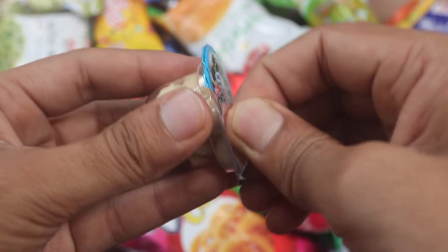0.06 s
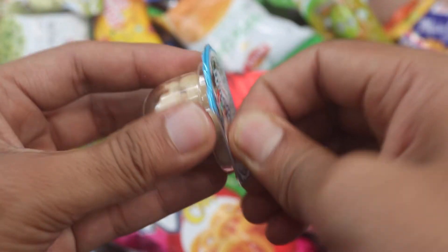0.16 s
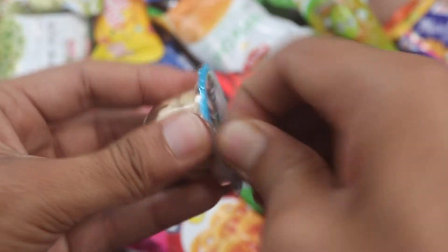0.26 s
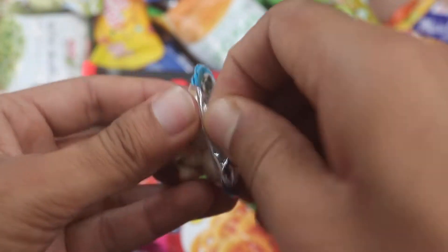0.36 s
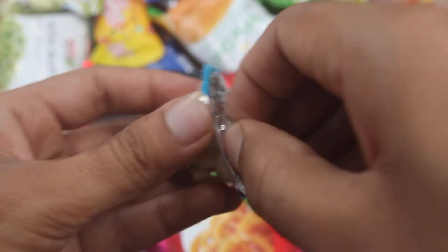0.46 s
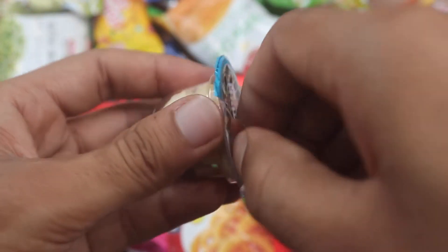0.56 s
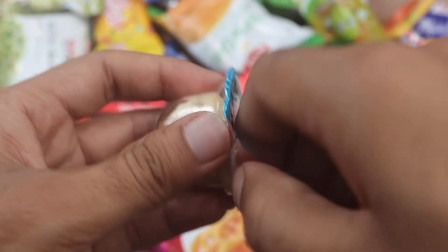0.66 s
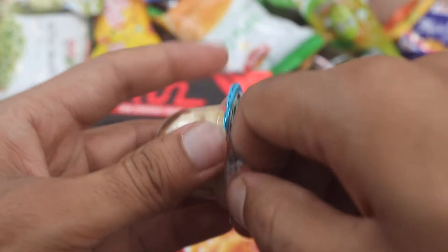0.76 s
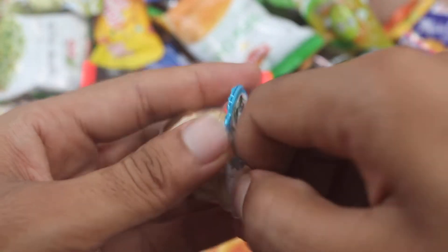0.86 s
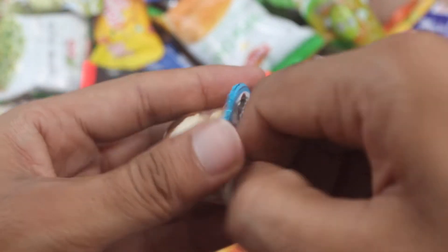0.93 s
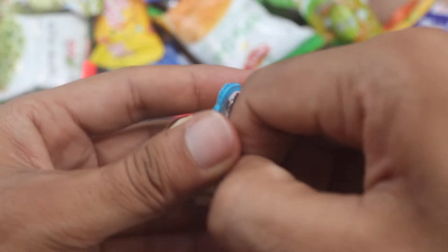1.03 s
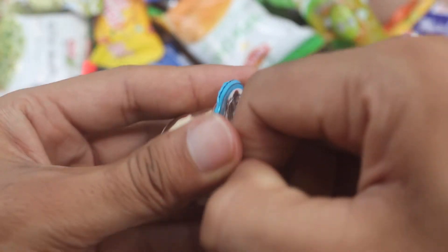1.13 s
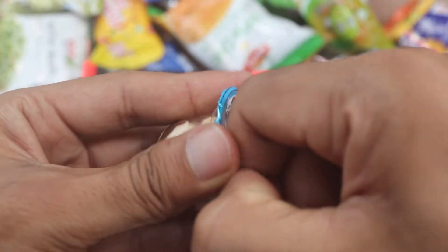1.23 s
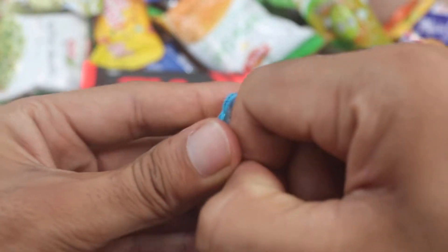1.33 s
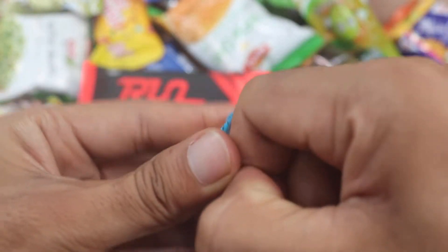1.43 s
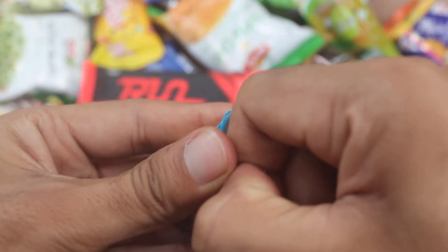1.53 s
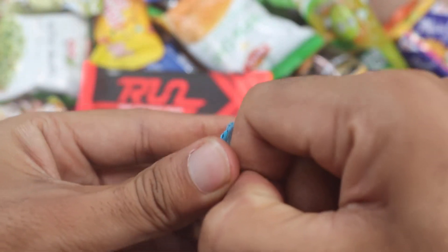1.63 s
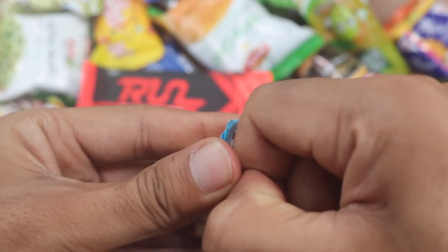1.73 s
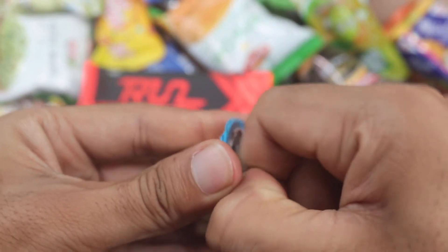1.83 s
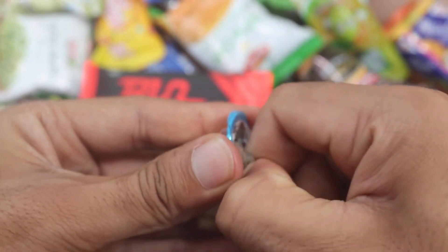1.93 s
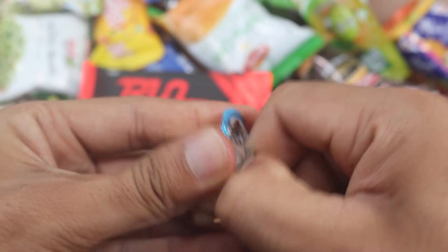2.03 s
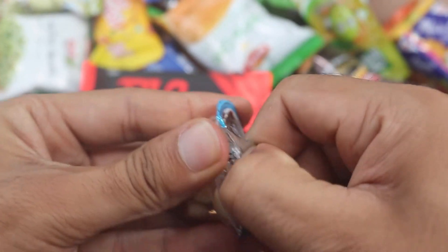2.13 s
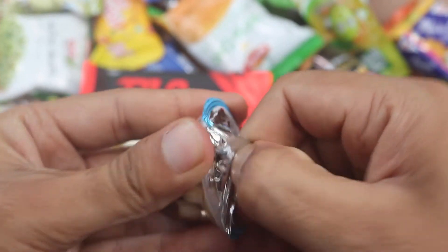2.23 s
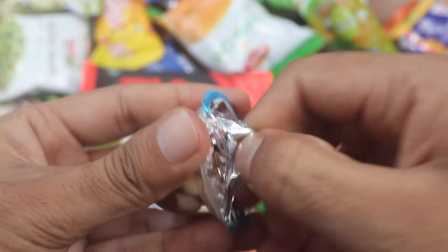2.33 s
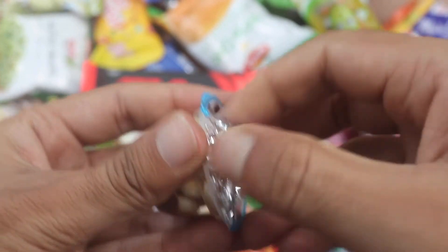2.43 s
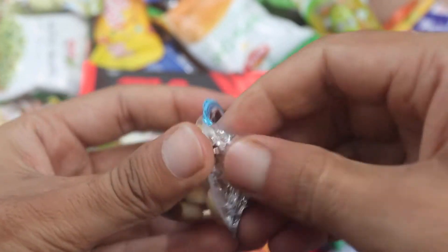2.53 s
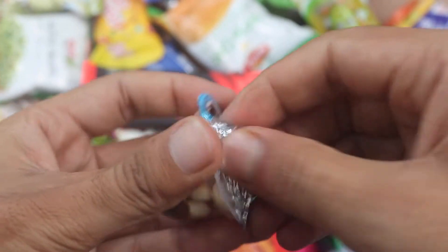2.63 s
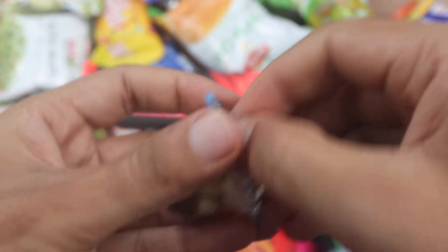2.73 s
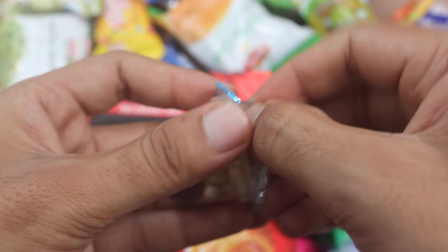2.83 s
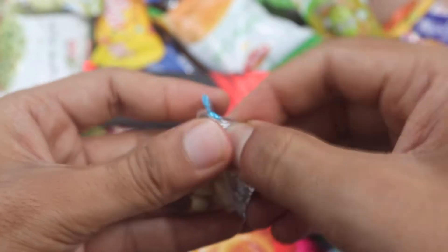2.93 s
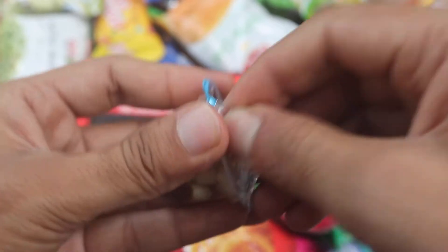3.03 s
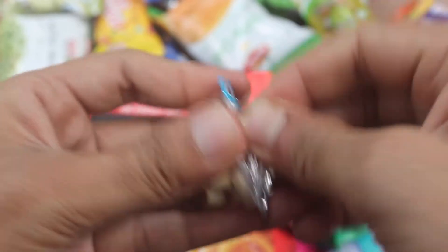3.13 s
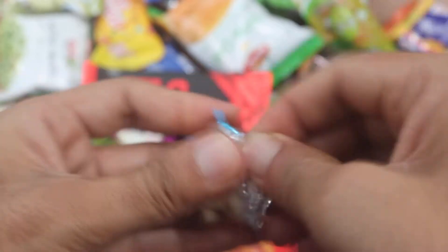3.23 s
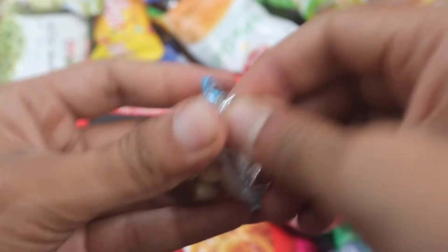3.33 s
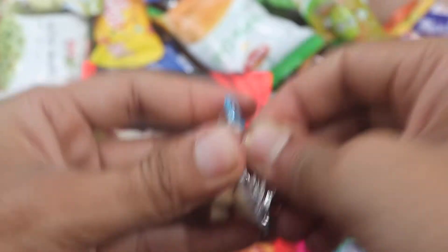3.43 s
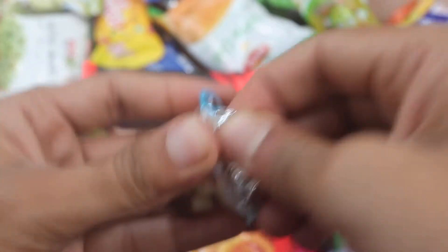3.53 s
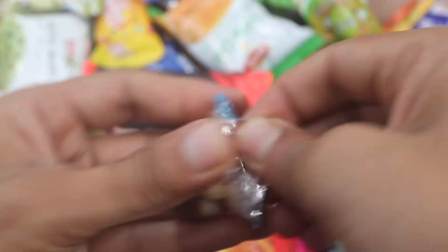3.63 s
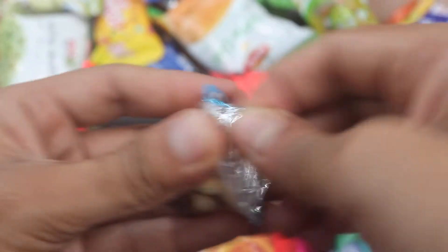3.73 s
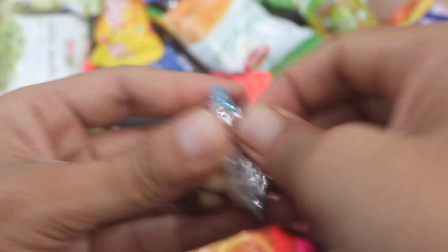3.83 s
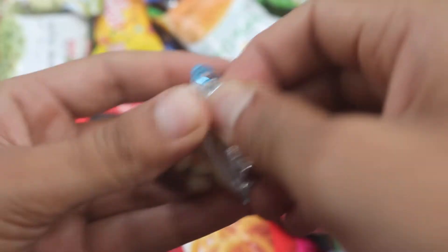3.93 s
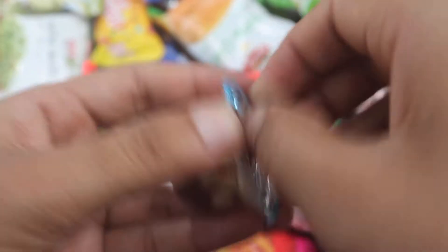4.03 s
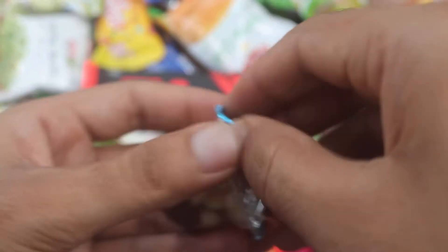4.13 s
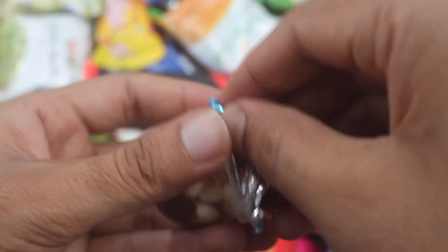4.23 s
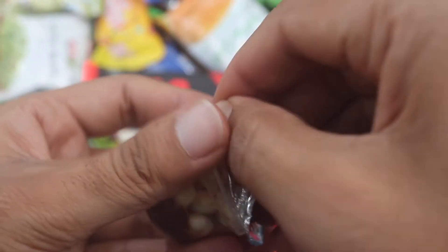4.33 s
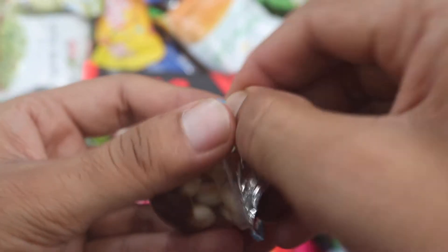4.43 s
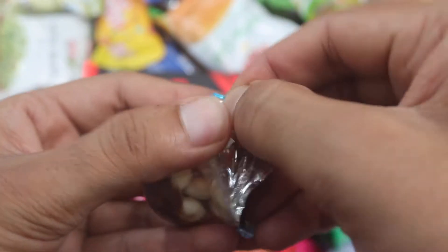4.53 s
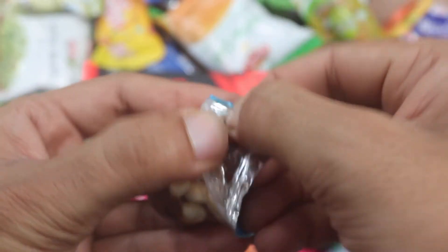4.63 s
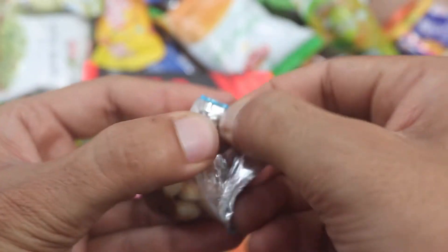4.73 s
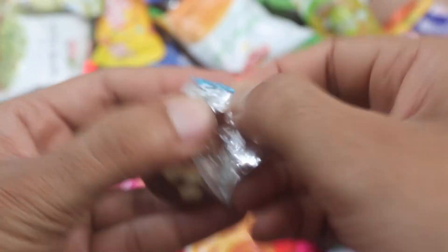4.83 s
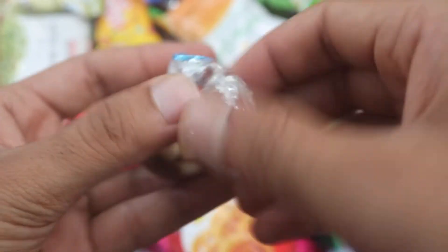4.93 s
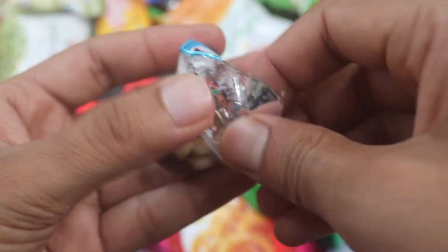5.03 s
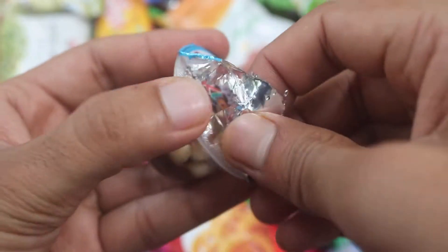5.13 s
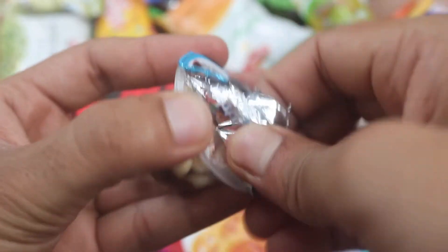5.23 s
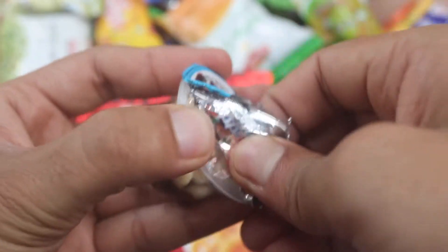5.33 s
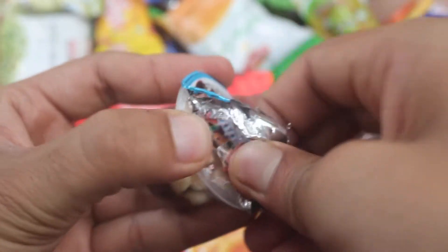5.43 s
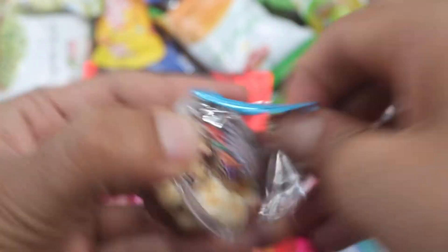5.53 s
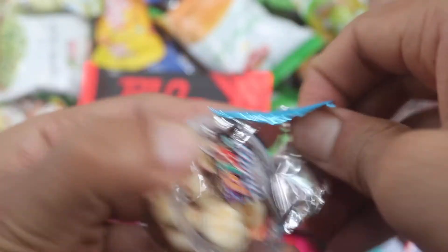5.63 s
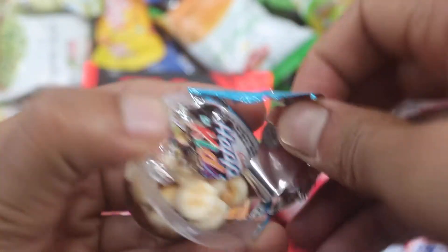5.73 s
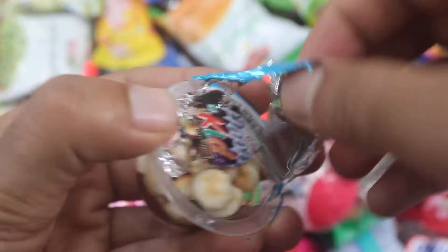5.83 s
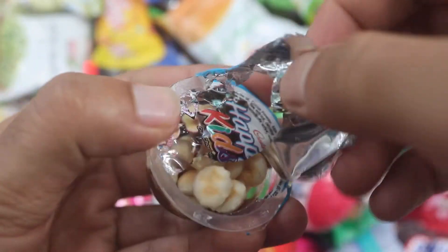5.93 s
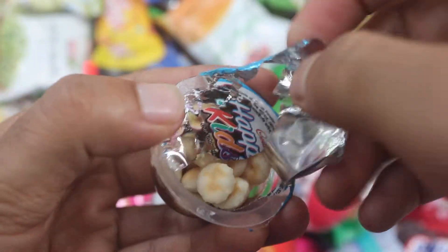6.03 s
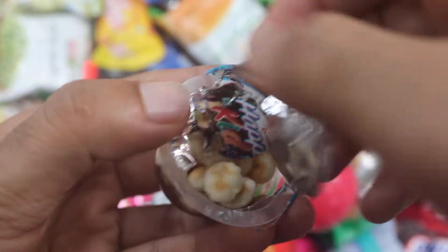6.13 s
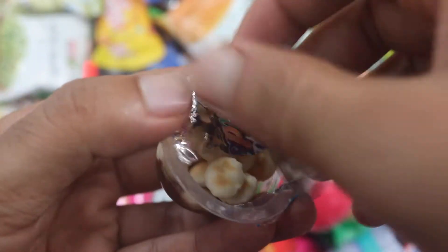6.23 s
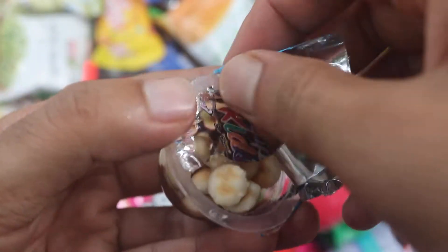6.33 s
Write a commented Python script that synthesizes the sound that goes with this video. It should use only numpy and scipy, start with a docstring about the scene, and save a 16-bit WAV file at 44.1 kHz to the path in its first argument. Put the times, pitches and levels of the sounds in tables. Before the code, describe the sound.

Sparse foil clicks grow into dense bright crackling, short rips of a tearing seal and finger rubs, over a faint quiet room murmur.

```python
"""Indoors, close to a stereo microphone, fingers work the foil lid off a small plastic cup.
Creases snap as cracks, fizz and a few cycles of cup ring; the seal tears in rushes of tiny fractures.
Hands rub as scraping and thudding noise, a fingertip slides in narrow bands, and the held foil rustles.
Under it lie a low noise murmur, a thin whine and a wandering high hiss; faint chirping pulses at the start."""
import sys
import numpy as np
from scipy import signal
from scipy.fft import rfft, irfft, next_fast_len
from scipy.io import wavfile
from scipy.ndimage import map_coordinates

SR = 44100
rng = np.random.default_rng(int(sys.argv[2]) if len(sys.argv) > 2 else 0)


def materialize(psi):
    """Save the field psi as 16-bit PCM at rate SR to the path in sys.argv[1].

    A 1-D psi becomes a single channel; in a 2-D psi each row is a channel.
    """
    bounded = np.clip(np.atleast_2d(psi).T, -1, 1)
    quanta = np.round(bounded * 32767).astype(np.int16)
    wavfile.write(sys.argv[1], SR, quanta)


N = 280917
TIME = np.arange(N) / SR  # s

# large creases snapping: start_s, level_db (before the snaps' common trim), ring_pitch_hz,
# brightness_db (fizz over ring)
CREASES = [(.024, -35.5, 1080, -20), (0.297, -33.5, 1420, -39), (.400, -41, 1710, -10),
           (.545, -47, 1300, 18), (.675, -41, 1230, -2), (.885, -44.5, 2100, 15), (1.157, -44.5, 1300, -28),
           (1.169, -34.5, 1410, -4), (1.220, -35, 1350, -4.5), (1.264, -38, 1130, -17),
           (1.277, -47.5, 1770, -7), (1.528, -51.5, 1170, -53), (1.980, -46, 1570, 6), (1.99, -38, 1740, 9),
           (2.3073, -43, 1570, -5), (2.357, -32, 1340, -9), (2.373, -31, 1240, 7),
           (2.383, -29.5, 1280, -10), (2.416, -38, 1380, 1), (2.448, -34, 1210, 6), (2.4617, -33, 1390, 0),
           (2.484, -30.5, 1370, -2), (2.4979, -24.5, 1340, -1), (2.717, -39.5, 2050, 2),
           (2.818, -38.5, 1540, -21), (2.824, -28, 1390, 0.5), (2.853, -29, 1500, -7),
           (2.890, -35, 1420, -4.5), (2.983, -33, 1310, -9.5), (2.9984, -36.5, 1430, -2),
           (3.057, -36.5, 1270, -21), (3.135, -33, 1960, -17), (3.1665, -30.5, 1820, 7.5),
           (3.190, -29.5, 1680, -1), (3.245, -36, 1250, -21), (3.279, -37.5, 1390, -7),
           (3.298, -32, 1730, -8), (3.307, -33.5, 1590, -7), (3.452, -23.5, 1600, -9),
           (3.552, -28.5, 1340, -30), (3.575, -31, 1240, -44), (3.596, -33, 1100, -35),
           (3.657, -24.5, 1600, -4), (3.667, -29.5, 1350, -6), (3.708, -31, 1340, -9.5),
           (3.734, -32.5, 1290, -25), (3.776, -33.5, 1230, -30), (3.811, -32.5, 1370, -6),
           (3.838, -29, 1400, -24), (3.963, -36, 2020, -37), (4.011, -34.5, 1540, -28),
           (4.038, -39, 1240, -13), (4.157, -31, 1320, -3), (4.206, -34.5, 1310, 4),
           (4.3567, -41.5, 1770, 16), (4.37, -37, 1380, 1.5), (4.4897, -42, 1310, -9),
           (4.509, -37.5, 2120, -16), (4.575, -40, 920, 13), (4.585, -34, 1440, -8),
           (4.614, -41, 1070, -18), (4.730, -38.5, 1950, 3), (4.738, -36, 1380, -14),
           (4.790, -32.5, 1720, -4), (4.806, -38.5, 1860, -9), (4.839, -41.5, 1290, -12),
           (4.868, -43, 1490, -41), (4.959, -29, 1280, -7.5), (5.021, -42.5, 1240, 6),
           (5.2011, -42, 1270, -2.5), (5.273, -41.5, 1250, 14), (5.299, -35, 1370, -18),
           (5.315, -43.5, 1990, 16), (5.398, -30, 1470, -5), (5.4543, -32.5, 1690, -29),
           (5.547, -28, 1890, 11), (5.580, -31, 1980, 1), (5.587, -21, 1950, 1.5), (5.5965, -22, 2090, 6),
           (5.632, -31.5, 1220, 7), (5.737, -35, 1530, -3), (5.874, -36, 1970, 7), (6.113, -45.5, 1060, -8)]
# fine rustle of the foil under the fingers: time_s, level_db (before the rustle's trim)
FOIL_WORK = [(0, -61), (.5, -62.5), (.95, -59.5), (1.1, -66), (1.75, -74.5), (1.95, -59.5), (2.9, -50.5),
             (3.5, -46.5), (4, -53.5), (4.3, -59.5), (4.6, -56), (4.95, -53), (5.2, -55), (6.1, -54.5),
             (6.37, -60.5)]
# relative noise spectra of cup ring, foil crack, foil fizz and tearing seal: frequency_hz, density_db
CUP_SPECTRUM = [(40, -25), (200, -16.5), (430, -18.5), (620, -5.5), (850, -6.5), (1300, -1), (1900, 0),
                (2400, -5), (3200, -33)]
CRACK_SPECTRUM = [(1600, -23.5), (2500, 1.5), (3700, 3.5), (6400, 0.5), (8500, -31.5), (12000, -36.5)]
FIZZ_SPECTRUM = [(5000, -18), (7200, 0.5), (10000, -3), (11200, -9.5), (12500, -3), (16000, -13)]
TEAR_SPECTRUM = [(200, -40), (700, -5), (1250, 0.5), (2000, -1.5), (3200, 1.5), (5800, -1.5), (8000, -3),
                 (16000, -8.5)]


def amp(db):
    """Decibels to gain."""
    return 10 ** (np.asarray(db) / 20)


def unit(x):
    """Scale to rms 1."""
    return x / np.sqrt(np.mean(x ** 2) + 1e-20)


def along(points, hz):
    """(Hz, value) points read on a log frequency axis."""
    f, value = np.transpose(points)
    return np.interp(np.log(hz + 1), np.log(f), value)


def level_at(points):
    """(s, value) points read at every sample."""
    return np.interp(TIME, *np.transpose(points))


def bump(middle_s, half_s):
    """A smooth bell in time, down to 1/e at half_s from its middle."""
    return np.exp(-((TIME - middle_s) / half_s) ** 2)


def filtered(x, response):
    """x times a response of frequency."""
    size = next_fast_len(N + SR // 2)
    return irfft(rfft(x, size) * response(np.fft.rfftfreq(size, 1 / SR)), size)[..., :N]


def coloured(x, spectrum, size=1024):
    """x through a causal, minimum-phase filter with the given spectrum."""
    gain = amp(along(spectrum, np.fft.rfftfreq(size, 1 / SR)))
    cepstrum = irfft(np.log(gain))
    # folding the cepstrum forward makes the filter causal
    cepstrum[1:size // 2] *= 2
    cepstrum[size // 2 + 1:] = 0
    impulse = irfft(np.exp(rfft(cepstrum)))
    return signal.fftconvolve(x, impulse[None], axes=1)[:, :x.shape[1]]


def wobble(rate):
    """A smooth random curve, rate knots a second."""
    knots = rng.standard_normal(int(N * rate / SR) + 4)
    return map_coordinates(knots, [TIME * rate / SR])


def pair(length, side_db):
    """Left and right white noise, alike but for a side part."""
    mid, side = rng.standard_normal((2, length))
    side = amp(side_db) * side
    return np.array([mid + side, mid - side])


def placed(x, right_db):
    """A pair leaning to the right, its middle at rms 1."""
    x = x * amp([[-right_db / 2], [right_db / 2]])
    return x / np.sqrt(np.mean(x.mean(axis=0) ** 2) + 1e-20)


def grains(rate, spread_db, side_db):
    """Tiny fractures at random moments, rate a second, a few much larger than the rest."""
    sizes = amp(spread_db * np.minimum(rng.exponential(size=N), 3))
    return pair(N, side_db) * sizes * (rng.random(N) < rate / SR)


def noise_band(hz, width_hz):
    """Narrow stereo noise: slow noise carried on a centre frequency that may move."""
    slow = filtered(rng.standard_normal((2, 2, N)), lambda f: np.exp(-2 * (f / width_hz) ** 2))
    phase = 2 * np.pi * np.cumsum(hz * np.ones(N)) / SR
    return slow[0] * np.cos(phase) + slow[1] * np.sin(phase)


def background():
    """Room murmur, less alike left and right as pitch rises, a wavering whine and a wandering hiss."""
    # relative murmur spectrum: frequency_hz, density_db
    murmur_spectrum = [(25, -27), (100, 1.5), (260, -1.5), (380, -9.5), (900, -15), (1220, -18.5),
                       (1450, -17), (4000, -20.5), (7500, -25.5), (10500, -20), (11200, -33.5)]
    # left-right likeness of the murmur: frequency_hz, correlation (0 to 1)
    likeness = [(200, 0.95), (700, 0.51), (3000, 0.043)]
    # the murmur swells a little: time_s, level_db
    murmur_swell = [(0, -61), (3, -58), (5.2, -62)]
    # the wandering hiss: time_s, centre_hz, level_db (before its random wavering)
    hiss_path = [(0.999, 9800, -82.5), (3.798, 9160, -67.5), (5.399, 9720, -60), (6.051, 8980, -57.5),
                 (6.37, 9300, -64)]

    def mid_side_response(f):
        turn = np.arccos(np.clip(along(likeness, f), -1, 1)) / 2
        return amp(along(murmur_spectrum, f)) * [np.cos(turn), np.sin(turn)]

    mid, side = filtered(rng.standard_normal((2, N)), mid_side_response)
    murmur = amp(level_at(murmur_swell)) * unit(np.array([mid + side, mid - side]))
    s, hz, db = np.transpose(hiss_path)
    hiss_gain = amp(np.interp(TIME, s, db) + 3.7 * wobble(12))
    hiss = hiss_gain * placed(noise_band(np.interp(TIME, s, hz), width_hz=1700), right_db=1.0)
    whine = amp(-72 + 2.5 * wobble(8)) * unit(noise_band(6800, width_hz=230))
    return murmur + hiss + whine


def rustle():
    """The held foil never lies quite still: clumped ticks over soft brushing, brighter when worked harder."""
    level_db = level_at(FOIL_WORK)
    bright = amp((level_db - level_db.mean()) / 2)

    def ticks(spectrum, rate):
        return unit(coloured(grains(rate, spread_db=9, side_db=-1.5), spectrum))

    brush = placed(coloured(pair(N, side_db=-2), TEAR_SPECTRUM), right_db=2)
    crinkle = ticks(CUP_SPECTRUM, rate=400) + ticks(CRACK_SPECTRUM, rate=260)
    crinkle = crinkle + amp(-3) * (brush + bright * ticks(FIZZ_SPECTRUM, rate=300))
    clumps = unit(amp(3.5 * wobble(30)))
    return amp(level_db - 9.5) * clumps * crinkle


def snap(hz, bright_db, ring_t60=0.011, cup_t60=0.023, crack_t60=0.018, fizz_t60=0.012,
         mode_db=2, edge_db=9, lead_in_db=-13):
    """A crease flips in quick steps: sharp cracks from the foil and a few cycles of the hand-damped cup."""
    crack_db, crack_follows = 3.5, 0.37  # crack over ring; share of the brightness it takes on
    t = np.arange(-(SR // 200), SR // 30) / SR  # s, the flip at 0

    def fade(t60, delay=0):
        return (t >= delay) * amp(-60 * np.abs(t - delay) / t60)

    def facet(spectrum):  # each facet has its own colour
        return [(f, db + rng.normal(0, 0.82)) for f, db in spectrum]

    def mode(pitch_hz):
        return unit(np.sin(2 * np.pi * pitch_hz * t) * fade(ring_t60) * (1 - fade(0.003)))

    # a weak noise lead-in that softens the attack
    lead_in = amp(lead_in_db) * (t < 0) * np.exp(-np.abs(t) / 0.00067)
    late_steps = sum(rng.random() * fade(0.00027, delay) for delay in rng.uniform(-.0005, 0.0031, size=2))
    steps = fade(0.0014) + late_steps

    def burst(spectrum, t60, side_db):
        envelope = lead_in + fade(t60) + amp(edge_db) * steps
        return coloured(pair(len(t), side_db) * envelope, spectrum)

    cup = unit(burst(CUP_SPECTRUM, cup_t60, side_db=-10))
    ring = placed(cup + amp(mode_db) * mode(hz), right_db=-0.4)
    ping = amp(-4) * mode(rng.uniform(2700, 5400))
    foil = unit(burst(facet(CRACK_SPECTRUM), crack_t60, side_db=-7.5))
    crack = placed(foil + ping, right_db=rng.normal(2.0, 3.6))
    fizz = placed(burst(facet(FIZZ_SPECTRUM), fizz_t60, side_db=-4), right_db=rng.normal(1.6, 1.2))
    # a sharper fold moves energy from ring to fizz
    shares = amp([0, crack_db + crack_follows * bright_db, bright_db])
    return np.tensordot(shares / np.linalg.norm(shares), [ring, crack, fizz], 1)


def neighbours():
    """Rows like CREASES: around each snap a crease beside it flips, mostly weaker and of similar colour."""
    under_db, scatter_s = -14.5, .012  # mean level against the snap; time spread
    shift, size, pitch, bright = rng.standard_normal((len(CREASES), 4)).T
    s, db, hz, bright_db = np.transpose(CREASES)
    return list(zip(np.abs(s + scatter_s * shift), db + under_db + 2.8 * size,
                    hz * np.exp(.18 * pitch), bright_db + 6 * bright))


def small_creases(count=45):
    """Rows like CREASES, by chance: the harder the foil is worked, the more small creases flip and the louder."""
    over_db, spread_db = 7.5, 4  # over the FOIL_WORK level, both before their trims
    ring_hz, bright_db, bright_spread_db = 1455, 5, 6
    level_db = level_at(FOIL_WORK)
    work = np.cumsum(amp(level_db))
    # one crease at random in each equal share of the work
    at = np.searchsorted(work, work[-1] * (np.arange(count) + rng.random(count)) / count)
    size, pitch, bright = rng.standard_normal((count, 3)).T
    return list(zip(TIME[at], level_db[at] + over_db + spread_db * size,
                    ring_hz * np.exp(.18 * pitch), bright_db + bright_spread_db * bright))


def snaps():
    """Every crease, large or small, snaps by the same law."""
    out = np.zeros((2, N + SR))
    lead = SR // 200  # samples of lead-in ahead of each flip
    for s, db, hz, bright_db in CREASES + neighbours() + small_creases():
        click = amp(db) * snap(hz, bright_db)
        out[:, int(s * SR):][:, :click.shape[1]] += click
    return amp(-8.0) * out[:, lead:lead + N]


def chirps(count=4):
    """A thin, insect-like band pulses evenly, then stops."""
    first_s, period_s, half_s = 0.18, 0.223, 0.084
    pulses = sum(bump(first_s + k * period_s, half_s) for k in range(count))
    return amp(-65.5) * pulses * unit(noise_band(10260, width_hz=480))


def slides():
    """A sliding fingertip chatters in one narrow band, a soft low groan or a thin squeak."""
    # a fingertip on the cup: middle_s, half_length_s, centre_hz, width_hz, level_db
    strokes = [(0.205, 0.051, 2390, 70, -66.5), (.54, .098, 321.5, 148, -58), (4.139, .04, 448.4, 265, -46)]
    return sum(amp(db) * bump(s, half) * unit(noise_band(hz, width)[0])
               for s, half, hz, width, db in strokes)


def rubs():
    """Skin drags in uneven slips: a dry scrape with flaring resonances and a soft thud beneath it."""
    # hands rubbing: middle_s, half_length_s, scrape_db (gain), thud_db (gain)
    strokes = [(1.827, .015, -38, -50), (1.87, 0.025, -39.5, -47), (2.033, 0.019, -33, -44.5),
               (2.084, 0.023, -35.5, -55), (2.265, 0.019, -39, -49), (2.562, .017, -34.5, -41),
               (2.696, 0.014, -41, -50), (2.761, 0.018, -48, -55.5), (3.096, 0.012, -32, -38.5),
               (3.228, 0.013, -40.5, -50), (3.373, 0.028, -36, -43.5), (3.527, 0.016, -37, -49.5),
               (4.112, 0.017, -35.5, -42), (4.153, .018, -41.5, -47.5), (4.652, 0.014, -50, -67)]
    # relative spectra of scrape and thud: frequency_hz, density_db
    scrape_spectrum = [(350, -26), (500, 2.5), (1600, 3), (2100, 4), (3200, 5.5), (4200, -1), (10200, -9.5),
                       (11200, -12.5), (12600, -7), (15500, -46)]
    thud_spectrum = [(35, -16), (75, -3), (150, 1), (290, -1), (450, -11.5), (800, -24)]
    # resonances of the scrape: centre_hz, width_hz, level_db (against the plain scrape)
    resonances = [(1220, 380, -18), (2084, 620, -1), (2964, 540, -1.5)]
    envelopes = np.array([bump(s, half) for s, half, _, _ in strokes])
    scrape_gain, thud_gain = amp(np.array(strokes)[:, 2:].T) @ envelopes
    flares = sum(amp(db) * unit(amp(4.2 * wobble(70)) * noise_band(hz, width))
                 for hz, width, db in resonances)
    slips = unit(amp(3.8 * wobble(140)))
    skin = unit(coloured(pair(N, side_db=-0.5), scrape_spectrum))
    scrape = slips * placed(skin + flares, right_db=1.0)
    thud = placed(coloured(pair(N, side_db=-3.0), thud_spectrum), right_db=9.5)
    return scrape_gain * scrape + thud_gain * thud


def tears():
    """The glue parts in uneven rushes of fractures that swell and die."""
    # the seal giving way: peak_s, level_db, rise_s
    rushes = [(3.327, -21, 0.0038), (3.436, -30.5, 0.0076), (3.452, -17.5, 0.0024), (3.569, -25.5, 0.0028),
              (3.651, -25, 0.0061), (3.752, -27, 0.0047), (3.83, -23.5, 0.0057), (3.942, -30.5, 0.0063),
              (4.090, -28.5, 0.0094), (4.683, -40, 0.007), (5.555, -36.5, 0.0067), (5.593, -18.5, 0.0077),
              (5.640, -34, 0.017), (5.747, -37, 0.0086)]
    fall = 1.11  # time a tear takes to die, over its rise
    pull = sum(amp(db) * np.exp(-np.maximum(s - TIME, (TIME - s) / fall) / rise) for s, db, rise in rushes)
    catches = unit(amp(2.5 * wobble(330)))
    fractures = grains(rate=8200, spread_db=8.0, side_db=-7.0)
    return pull * catches * placed(coloured(fractures, TEAR_SPECTRUM), right_db=1.5)


def room(x, t60=0.21, early_db=-19, tail_db=-23):
    """Hands and table answer within milliseconds, the room with a weak tail, both as decaying noise."""
    t = np.arange(SR // 3) / SR

    def shaped(envelope):
        return rng.standard_normal((2, len(t))) * envelope / np.linalg.norm(envelope)

    early = shaped((t > .002) * amp(-60 * t / 0.028))
    tail = shaped((t > .008) * amp(-60 * t / t60))
    return signal.fftconvolve(x, amp(early_db) * early + amp(tail_db) * tail, axes=1)[:, :N]


def scene():
    """Foil, cup and hands in the room, over the background and the chirping."""
    handling = snaps() + tears() + rubs() + slides() + rustle()
    return handling + room(handling) + background() + chirps()


def record(dry):
    """The recorder cuts the deep bass and falls off very steeply above its band limit."""
    top_hz = 16100
    low_cut = signal.butter(2, 45, "highpass", fs=SR, output="sos")
    return filtered(signal.sosfilt(low_cut, dry), lambda hz: 1 / (1 + (hz / top_hz) ** 120))


dry = scene()
out = record(dry)
materialize(out)
```